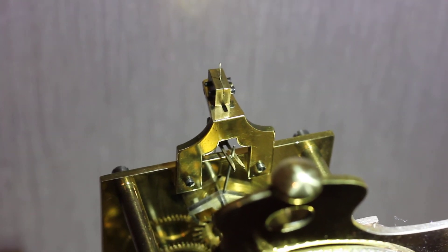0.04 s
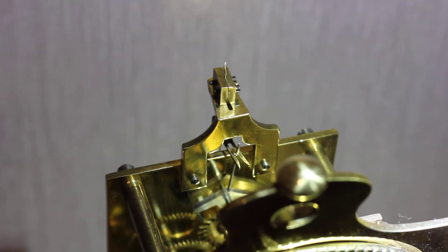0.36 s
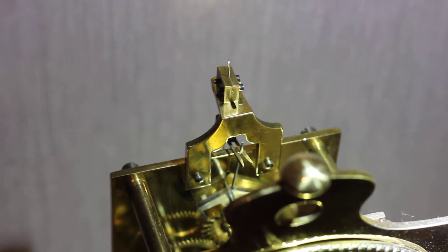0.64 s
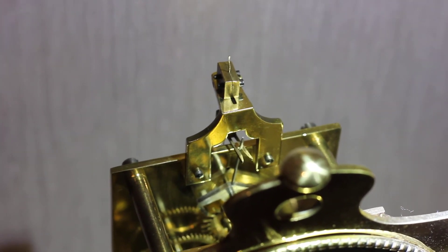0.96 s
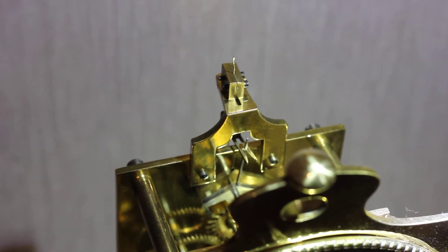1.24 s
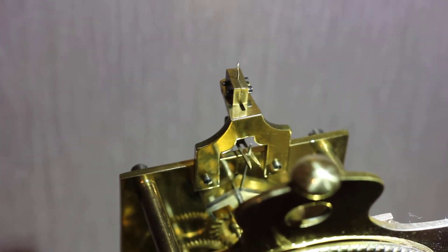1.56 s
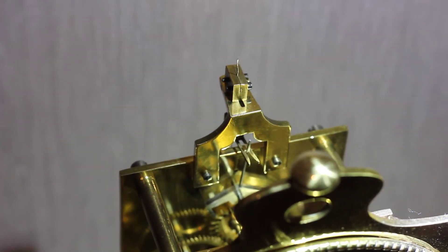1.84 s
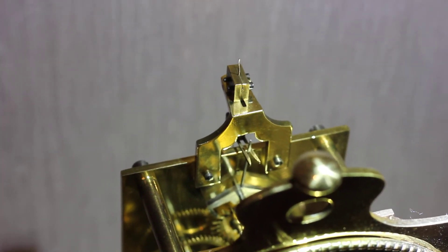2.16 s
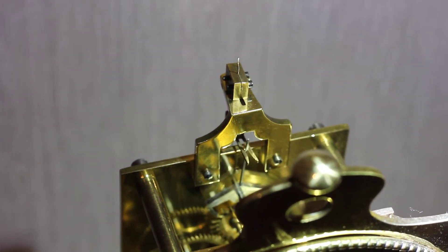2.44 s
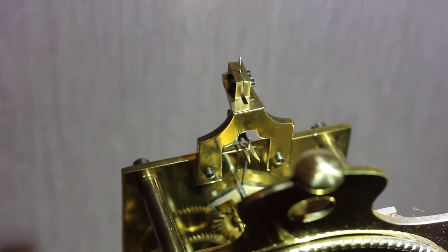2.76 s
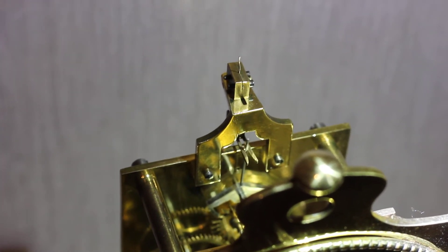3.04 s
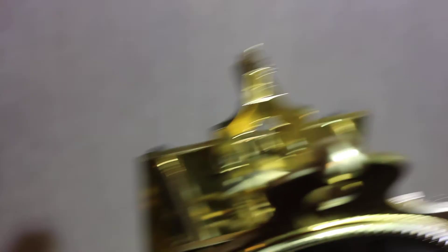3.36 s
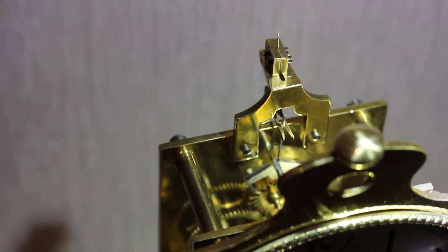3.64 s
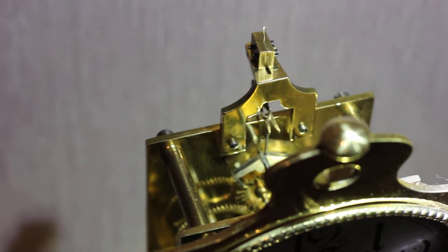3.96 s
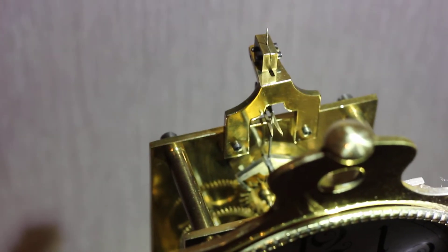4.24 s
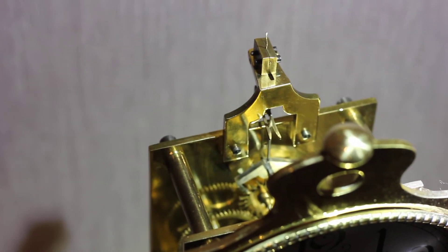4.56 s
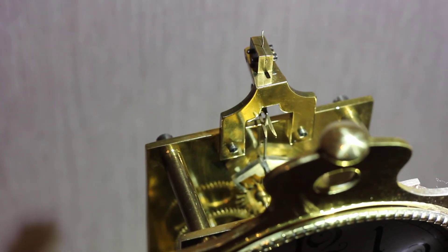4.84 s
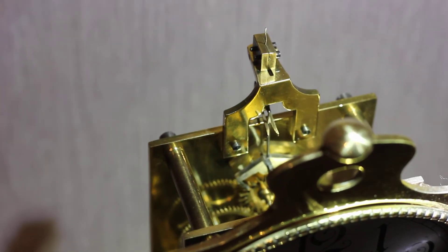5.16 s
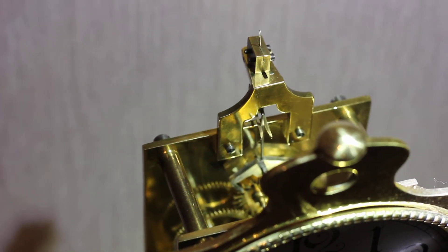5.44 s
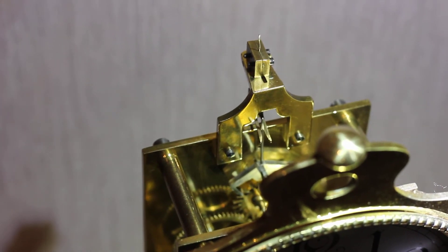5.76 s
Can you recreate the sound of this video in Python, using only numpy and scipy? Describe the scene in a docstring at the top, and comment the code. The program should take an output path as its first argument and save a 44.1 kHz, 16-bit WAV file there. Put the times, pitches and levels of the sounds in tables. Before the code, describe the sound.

A clock ticks faintly, then its brass works are bumped and knocked loudly, followed by soft hiss and dry pops.

```python
"""A clock ticks faintly in a quiet room while a brass clock movement is bumped softly near the microphone.
A loose lever clacks three times; at 3.3 s one heavy knock rings the frame, rattles the works, overloads
the microphone and ducks the gain. Brass slides briefly with a thin frictional squeal, then brushes lightly.
A soft rushing hiss swells from the knock onward, with dry pops and two short scrapes over it;
near the end a faint whistle joins and a thin steel part gives a tiny ping."""
import sys
import numpy as np
from scipy import signal
from scipy.fft import rfft, irfft
from scipy.io import wavfile

SR = 44100
rng = np.random.default_rng(int(sys.argv[2]) if len(sys.argv) > 2 else 0)


def transcribe(u):
    """Save the signal u as a 16-bit wav file named by the first command-line argument.

    u: samples, shape (n,) or (channels, n), limited to [-1, 1]; the rate is SR.
    q: integer samples, one column per channel.
    """
    v = np.clip(np.atleast_2d(u).T, -1, 1)
    q = np.round(v * 32767).astype(np.int16)
    wavfile.write(sys.argv[1], SR, q)


N = 259749
TIME = np.arange(N) / SR
BAND_EDGE_HZ = 15900
RUSH_START_S, RUSH_RISE_S = 3.3, 0.18


def gain_of(db):
    """Amplitude ratio of a level in decibels."""
    return 10 ** (np.asarray(db) / 20)


def curve_at(points, hz):
    """Interpolation on a logarithmic frequency axis."""
    point_hz, value = np.transpose(points)
    return np.interp(np.log(hz + 1), np.log(point_hz + 1), value)


def add(mix, start_s, sound):
    """Superposition: a sound adds to the mix from its start time."""
    part = mix[max(round(start_s * SR), 0):][:len(sound)]
    part += sound[:len(part)]


def onset(start_s, rise_s):
    """Envelope that rises linearly to 1 and stays."""
    return np.clip((TIME - start_s) / rise_s, 0, 1)


def burst(start_s, rise_s, hold_s, fall_db_per_s):
    """Envelope that rises, holds and decays exponentially."""
    falling_s = np.clip(TIME - start_s - rise_s - hold_s, 0, .2)
    return onset(start_s, rise_s) * gain_of(-fall_db_per_s * falling_s)


def stroke(start_s, length_s):
    """Envelope of rubbing: amplitude is a power of the speed, which follows half a sine."""
    speed = abs(np.sin(np.pi * onset(start_s, length_s)))
    return speed ** 1.6


def coloured(source, colour):
    """Source and filter: a signal takes on a spectrum; the result has rms 1."""
    response = gain_of(curve_at(colour, np.fft.rfftfreq(N, 1 / SR)))
    shaped = irfft(rfft(source) * response, N)
    return shaped / np.sqrt(np.mean(shaped ** 2) + 1e-20)


def noise(colour):
    """Filtered white noise at rms 1."""
    return coloured(rng.standard_normal(N), colour)


def friction(colour, grain_db):
    """Friction noise: countless tiny slips of uneven size, filtered by a body's response."""
    slips = rng.standard_normal(N)
    sizes = gain_of(grain_db * np.minimum(rng.exponential(1, N), 5))
    return coloured(slips * sizes, colour)


def ring(modes):
    """Free vibration: each mode of a struck body is a damped sinusoid."""
    t = TIME[TIME < max(t60 for _, _, t60 in modes) + .1]
    return sum(gain_of(db - 60 * t / t60) * np.sin(2 * np.pi * hz * t) for hz, db, t60 in modes)


def dense_ring(colour, decay, count=500):
    """High modal density: close modes in random phase merge, each damped according to its frequency."""
    t = TIME[:SR // 8]
    hz = np.linspace(np.sqrt(60), np.sqrt(BAND_EDGE_HZ), count)[:, None] ** 2
    size = gain_of(curve_at(colour, hz)) * hz ** .25  # offsets the wider spacing of high modes
    waves = np.sin(2 * np.pi * (hz * t + rng.random((count, 1))))
    damping = gain_of(-60 * t / curve_at(decay, hz))
    return (size * damping * waves).sum(0) / np.sqrt((size ** 2).sum() / 2)


def background(rumble_db=-54.5, rumble_drop_db=9, hum_db=-66, hiss_db=-62):
    """Filtered noise: room rumble that drops as the rush sets in, a wavering hum and microphone hiss."""
    # spectra of the three noises: frequency_hz, level_db
    rumble_colour = [(20, -17.5), (35, -4), (55, 0), (100, 3.5), (150, -4.5), (205, -2.5), (280, -13.5),
                     (350, -12.5), (520, -15), (750, -15.5), (1300, -23.5), (3000, -41.5), (15800, -70)]
    hum_colour = [(230, -44), (262, 3), (283, 2.5), (325, -37.5)]
    hiss_colour = [(100, -1.5), (1500, -2), (2700, -1.5), (3300, 1), (4100, -2.5), (8000, -5),
                   (12000, -7.5), (15800, -12)]
    room_db = rumble_db - rumble_drop_db * onset(RUSH_START_S, RUSH_RISE_S)
    layers = [(room_db, rumble_colour), (hum_db, hum_colour), (hiss_db, hiss_colour)]
    return sum(gain_of(db) * noise(colour) for db, colour in layers)


def ticks():
    """Impulse excitation: once a second a clock's beat rings dense modes and three distinct ones."""
    # beats: start_s, level_db
    beats = [(.6125, -57), (1.61, -56.5), (2.6106, -56)]
    # spectrum of the dense modes: frequency_hz, level_db
    colour = [(600, -22), (1550, -2), (2600, 4), (3400, -3), (5000, -9), (12000, -18)]
    # distinct modes: pitch_hz, level_db, t60_s
    modes = [(1540, 0, .07), (2070, 1, .06), (3380, 1, .06)]
    out = np.zeros(N)
    for start_s, db in beats:
        tick = ring(modes)
        add(tick, 0, dense_ring(colour, decay=[(1500, .06), (8000, .03)]))
        add(out, start_s, gain_of(db - 4) * tick)
    return out


def rush(start_db=-51, growth_db_per_s=1, pivot_hz=700):
    """Spectral tilt: a soft broadband hiss grows while its treble steadily brightens."""
    # spectrum before tilting: frequency_hz, level_db
    colour = [(30, -24.5), (70, -5.5), (130, -7.5), (200, 2), (300, -9.5), (400, -2.5), (520, -6.5),
              (680, -5), (1100, -6), (1700, -10), (2400, -15), (3500, -16), (5200, -25), (15800, -41.5)]
    hz, t, spectra = signal.stft(noise(colour), SR, nperseg=1024)
    age_s = t - RUSH_START_S
    tilt_db_per_octave = -1.5 + 0.72 * age_s
    octaves = np.log2(np.maximum(hz / pivot_hz, 1))[:, None]
    spectra *= gain_of(octaves * tilt_db_per_octave + start_db + growth_db_per_s * age_s)
    return onset(RUSH_START_S, RUSH_RISE_S) * signal.istft(spectra, SR, nperseg=1024)[1][:N]


def whistle(level_db=-68.5):
    """Narrow-band noise: one spectral peak is heard as a faint, fuzzy, high pitch."""
    # spectrum of the whistle: frequency_hz, level_db
    colour = [(4500, -29), (5900, -6), (6280, -1), (6600, -10), (7900, -15), (10000, -37)]
    return gain_of(level_db) * onset(start_s=5.46, rise_s=.08) * noise(colour)


def ping(start_s=5.54):
    """Free vibration: a thin steel part is brushed and rings on."""
    # modes of the steel: pitch_hz, level_db, t60_s
    modes = [(2340, -44.5, 0.062), (3970, -55, 0.089), (6100, -58, 0.11), (7200, -54.5, .22),
             (7900, -62, .08)]
    out = np.zeros(N)
    add(out, start_s, ring(modes))
    return out


def pops(swing_hz=290, swing_t60_s=0.005, low_cut_hz=130):
    """Heavily damped oscillation: each dry pop is a rounded step that swings back once."""
    # pops: start_s, peak_db, brightness_hz
    events = [(3.9876, -35.5, 450), (3.995, -28.5, 740), (4.3684, -36, 700), (4.376, -36, 450),
              (4.483, -20.5, 2400), (4.5985, -21, 2400), (5.0594, -33, 650), (5.1167, -22, 2000),
              (5.1278, -23, 1700), (5.247, -19.5, 2210)]
    out, t = np.zeros(N), TIME[:SR // 30]
    swing = gain_of(-60 * t / swing_t60_s) * np.cos(2 * np.pi * swing_hz * t + 0.52)
    swing = signal.lfilter(*signal.butter(1, low_cut_hz, "high", fs=SR), swing)
    for start_s, db, brightness_hz in events:
        pop = signal.lfilter(*signal.butter(3, 1.11 * brightness_hz, fs=SR), swing)
        add(out, start_s, gain_of(db) * pop / abs(pop).max())
    return out


def scrapes():
    """Coarse friction: uneven slips make short, gritty strokes that fade as they go."""
    # strokes: start_s, length_s, level_db, fade_db
    strokes = [(4.601, 0.039, -32.5, 15), (5.255, 0.018, -30.5, 9.5)]
    # spectrum of the scraping: frequency_hz, level_db
    colour = [(50, -18), (120, -2.5), (250, 1.5), (580, -3.5), (1640, -14.5), (2780, -11.5), (4000, -16.5),
              (7000, -19), (10000, -20), (15500, -38)]
    envelope = np.zeros(N)
    for start_s, length_s, db, fade_db in strokes:
        progress = np.linspace(0, 1, int(length_s * SR))
        taper = signal.windows.tukey(len(progress), .2)
        add(envelope, start_s, gain_of(db - fade_db * progress) * taper)
    return envelope * friction(colour, grain_db=3.5)


def sliding():
    """Sliding friction: brass squeals at its resonances and fizzes, then brushes, catching at times."""
    # sliding strokes: start_s, length_s, squeal_db, fizz_db
    slides = [(3.294, 0.17, -38, -42.5), (3.464, 0.12, -44, -57)]
    # light brushing stroke: start_s, length_s, level_db
    brushes = [(3.715, 0.26, -56)]
    # fine catches of the metal: start_s, level_db
    catches = [(3.529, -47), (3.795, -35.5), (3.8145, -54)]
    # spectra of the four friction sounds: frequency_hz, level_db
    squeal_colour = [(300, -20), (1800, -13.5), (2350, -8.5), (2680, 4), (3050, -12.5), (4500, -18),
                     (5100, -9), (5700, -20.5), (6900, -18), (8000, -28.5), (15500, -40.5)]
    fizz_colour = [(1000, -5.5), (4000, -2), (8000, -3), (10500, 1), (13000, 0), (15800, -11.5)]
    brush_colour = [(1500, -10), (2700, 15), (3400, 8), (4500, -5), (6200, -1), (7200, -6), (7850, 0),
                    (8450, -5), (9300, 4), (11500, 1), (13300, 2), (15800, -7)]
    catch_colour = [(3000, -22), (6000, 0.5), (7200, -5), (9500, 10), (13000, 5), (15800, 0)]
    squeal, fizz = friction(squeal_colour, grain_db=1.5), friction(fizz_colour, grain_db=2)
    brush, catch = friction(brush_colour, grain_db=4.5), friction(catch_colour, grain_db=1.5)
    out = np.zeros(N)
    for start_s, length_s, squeal_db, fizz_db in slides:
        out += stroke(start_s, length_s) * (gain_of(squeal_db) * squeal + gain_of(fizz_db) * fizz)
    for start_s, length_s, db in brushes:
        out += gain_of(db) * stroke(start_s, length_s) * brush
    for start_s, db in catches:
        out += gain_of(db) * burst(start_s, rise_s=0.0011, hold_s=0, fall_db_per_s=3500) * catch
    return out


def bumps(panel_db=-17, panel_cutoff_hz=800, sway_db=-16, sway_hz=82, sway_t60_s=0.073):
    """Forced, then free motion: a soft contact swings the case; its panels ring and its support sways."""
    # contacts, the last being the knock's thud: start_s, level_db, pitch_hz, length_s, push_ratio
    contacts = [(0.2303, -20.5, 120, 0.019, 0), (1.021, -24.5, 121, 0.018, 0), (1.694, -43, 210, 0.013, 0),
                (3.049, -22, 118, 0.019, 0.096), (3.201, -28.5, 190, .014, 0), (3.236, -27, 140, .012, 0),
                (3.257, -15.5, 151.6, .014, 0), (3.272, -9, 251, 0.0054, -.3),
                (3.2788, 25, 145.8, .0127, 0.66)]
    # modes of the case panels: pitch_hz, level_db, t60_s
    panel_modes = [(308, -0.5, 0.058), (483, 1.5, 0.0097)]
    softness = signal.butter(4, panel_cutoff_hz, fs=SR, output="sos")  # soft contact excites no treble
    panels = signal.sosfilt(softness, ring(panel_modes))
    sway = ring([(sway_hz, 0, sway_t60_s)])
    out = np.zeros(N)
    for start_s, db, hz, length_s, push_ratio in contacts:
        t = np.arange(0, length_s, 1 / SR)
        envelope = np.sin(np.pi * t / length_s) ** 1.9
        swing = np.sin(2 * np.pi * hz * t) + push_ratio  # the push is one-sided
        add(out, start_s, gain_of(db) * envelope * swing)
        add(out, start_s + 0.0008, gain_of(db + panel_db) * panels)
        add(out, start_s + length_s, gain_of(db + sway_db) * sway)
    return out


def clacks():
    """Contact hardness sets bandwidth: a loose lever drops and rings briefly over the duller plates."""
    # contacts of the lever and other small parts: start_s, level_db, cutoff_hz
    contacts = [(3.1557, -27, 5500), (3.2125, -27.5, 5500), (3.2434, -44.5, 5030), (3.2495, -26, 7500),
                (3.2597, -34.5, 3210), (3.2678, -35.5, 3500)]
    # spectrum of the plates: frequency_hz, level_db
    plate_colour = [(100, 7.5), (220, 4), (600, 0.5), (1100, -5.5), (1900, -9), (2600, -4), (3250, 0.5),
                    (4300, -28.5), (7000, -26), (9000, -30), (13000, -24.5), (16000, -40)]
    # decay of the plates: frequency_hz, t60_s
    plate_decay = [(200, 0.038), (900, 0.089), (3200, 0.014), (8000, 0.027), (14000, .012)]
    # modes of the lever: pitch_hz, level_db, t60_s
    lever_modes = [(2430, -9.5, .02), (3090, -2, 0.013), (3427, -4, 0.011)]
    out = np.zeros(N)
    for start_s, db, cutoff_hz in contacts:
        snap = dense_ring(plate_colour, plate_decay)
        add(snap, 0, ring(lever_modes))
        add(out, start_s, gain_of(db) * signal.lfilter(*signal.butter(2, cutoff_hz, fs=SR), snap))
    return out


def rattle(hold_s=0.0087, fall_db_per_s=1250.5):
    """Random contacts merge into noise: the loose works shake at the knock and again as they settle."""
    # shakes: start_s, rise_s, level_db
    shakes = [(3.2891, .0007, 4.5), (3.312, .017, -10)]
    # spectrum of the works: frequency_hz, level_db
    colour = [(60, -10), (230, 3.5), (420, -8.5), (700, -1.5), (1400, -3), (2200, -10.5), (3200, -10),
              (5200, -15.5), (7500, -27), (10000, -35), (15000, -50.5)]
    envelope = sum(gain_of(db) * burst(start_s, rise_s, hold_s, fall_db_per_s)
                   for start_s, rise_s, db in shakes)
    return envelope * friction(colour, grain_db=3.5)


def knock(crack_db=4, crack_t60_s=0.013):
    """Impact excites modes: the frame lands in quick blows with a crack; two faint high tones linger."""
    # blows on the frame: start_s, level_db
    blows = [(3.2907, 8), (3.293, 8), (3.2975, 8.5), (3.3016, -7.5)]
    # modes of the frame: pitch_hz, level_db, t60_s
    frame_modes = [(127, -10, 0.071), (215, -7.5, .085), (275, -14, 0.077), (351, 3.5, .076),
                   (438, -3.5, 0.039), (516.7, 2.5, 0.065), (600, -1, 0.055), (654, -7, 0.076),
                   (733, -0.5, 0.052), (867, -9, 0.05), (1015, -3, 0.051), (1110, -8, 0.04),
                   (1160, -6.5, 0.055), (1305, -18, 0.046), (1445, -7, 0.051), (1500, -9, 0.07),
                   (1625, -13.5, 0.07), (1817, -9.5, 0.043), (2018, -16, 0.098), (2290, -19, 0.089),
                   (2618, -17, 0.057)]
    # thin, very high tones after the knock: pitch_hz, level_db, t60_s
    high_tones = [(11020, -72.5, 11), (13550, -70, 2.2)]
    out = np.zeros(N)
    for start_s, db in blows:
        add(out, start_s, gain_of(db) * ring(frame_modes[1::2]))
        add(out, start_s, -gain_of(db) * ring(frame_modes[::2]))  # neighbouring modes in antiphase
    crack = dense_ring(colour=[(500, 3), (3000, 2), (6000, -4), (15000, -19)],
                       decay=[(500, crack_t60_s), (15000, crack_t60_s)])
    landing_s = blows[0][0]
    add(out, landing_s - .0006, gain_of(crack_db) * crack)  # just before the frame swings
    add(out, landing_s, ring(high_tones))
    return out


def gain_control(x, threshold_db=-11, attack_s=.008, recovery_db_per_s=23.5):
    """Automatic gain control: a peak over the threshold quickly lowers the gain, which creeps back."""
    peak_db = 20 * np.log10(np.clip(abs(x[0]), 1e-6, 1))
    recovery_db = recovery_db_per_s * TIME
    held_db = np.maximum.accumulate(peak_db + recovery_db) - recovery_db
    excess_db = np.maximum(held_db - threshold_db, 0)
    pole = np.exp(-1 / (attack_s * SR))
    return x * gain_of(-signal.lfilter([1 - pole], [1, -pole], excess_db))


def scene():
    """Superposition: all sources sum at one close microphone."""
    transients = bumps() + rattle() + knock() + clacks() + ticks() + ping() + pops()
    rubbing = sliding() + scrapes()
    sustained = background() + rush() + whistle()
    return (transients + rubbing + sustained)[None]


def record(dry):
    """Saturation: the knock outruns the gain control and clips with a rounded knee; a low-pass follows."""
    ducked = gain_control(dry)
    clipped = ducked / (1 + ducked ** 12) ** (1 / 12)
    low_pass = signal.firwin(255, BAND_EDGE_HZ, window=("kaiser", 8), fs=SR)
    return signal.oaconvolve(clipped, low_pass[None], "same")


dry = scene()
out = record(dry)
transcribe(out)
```